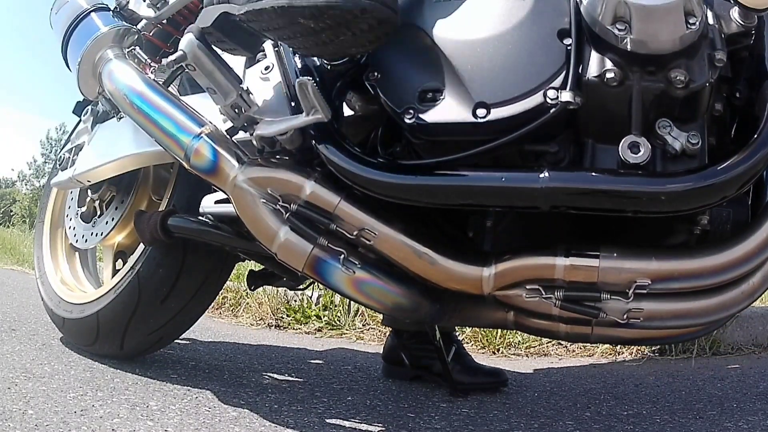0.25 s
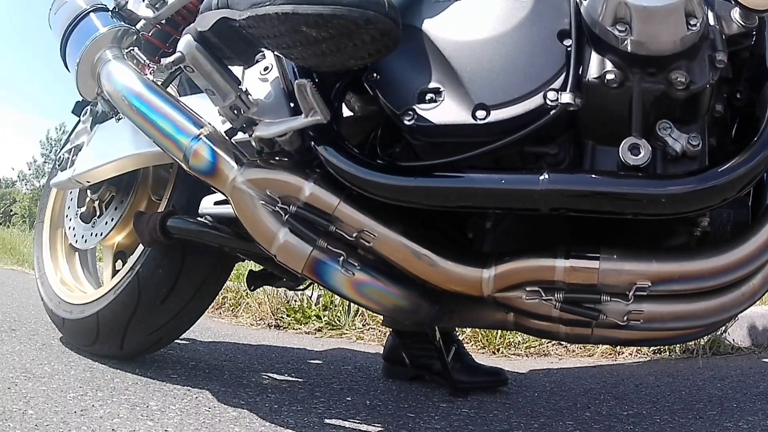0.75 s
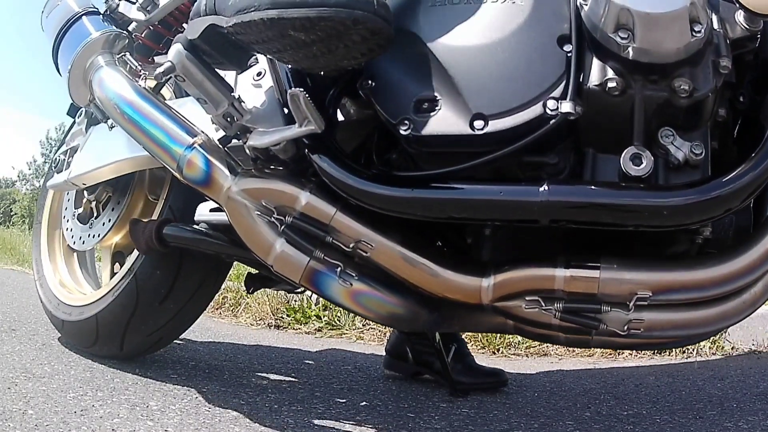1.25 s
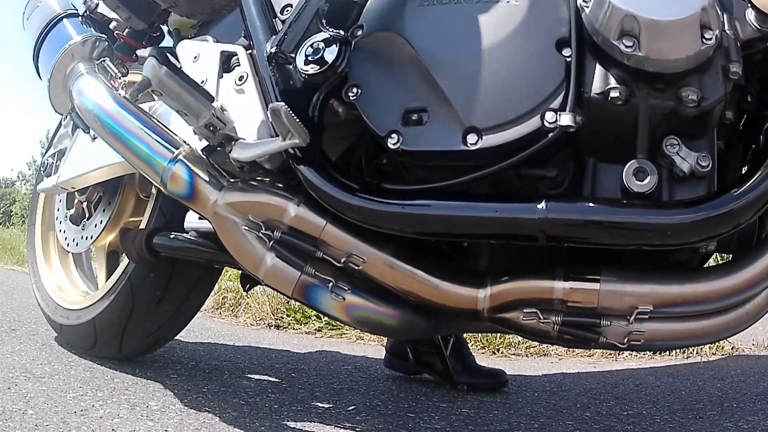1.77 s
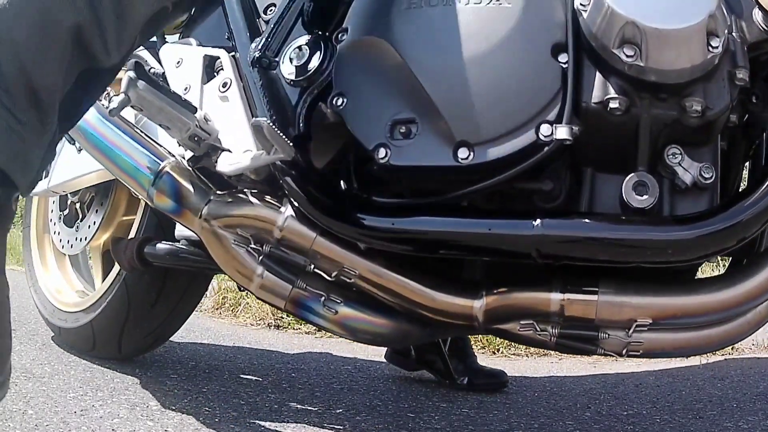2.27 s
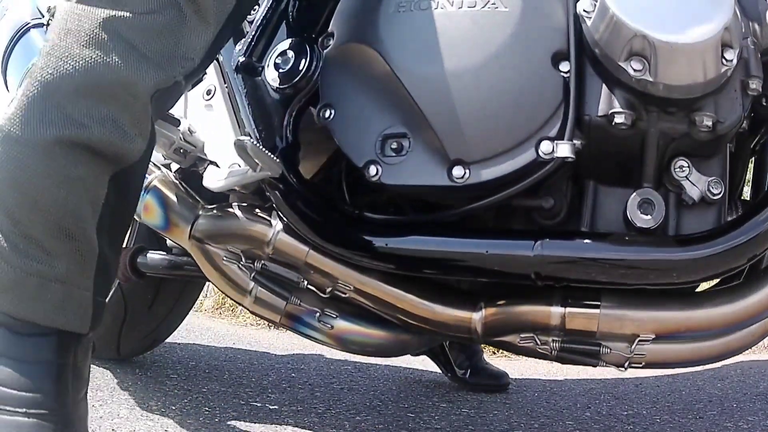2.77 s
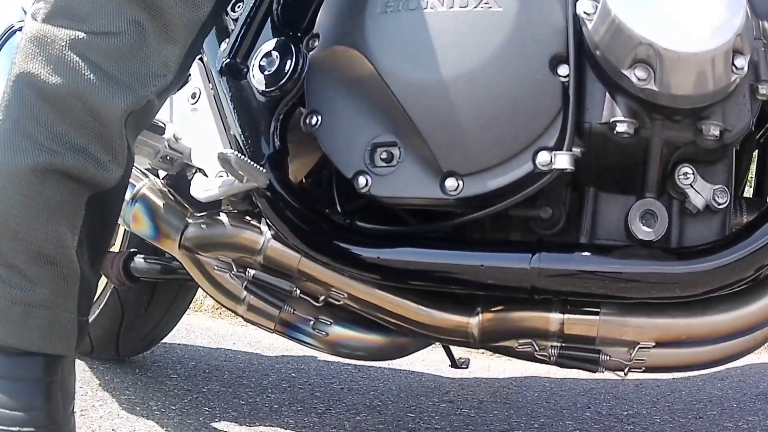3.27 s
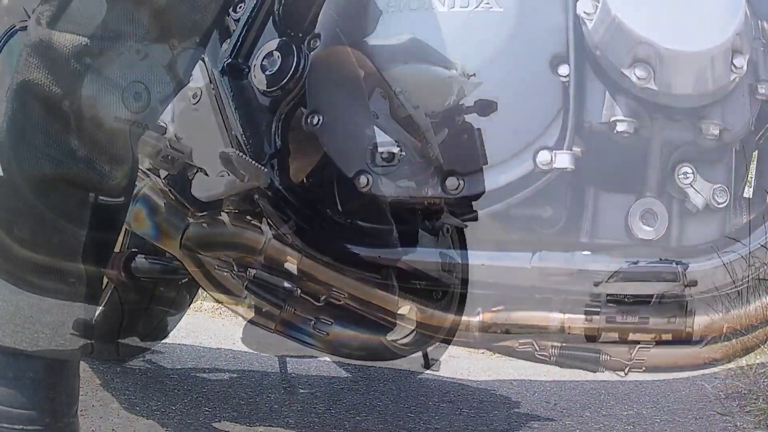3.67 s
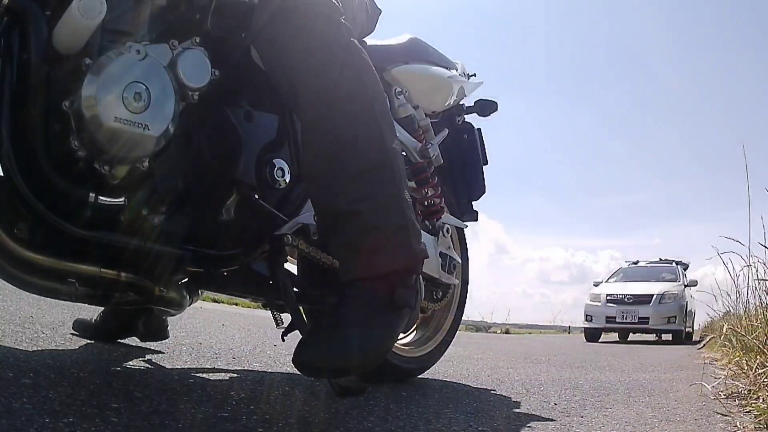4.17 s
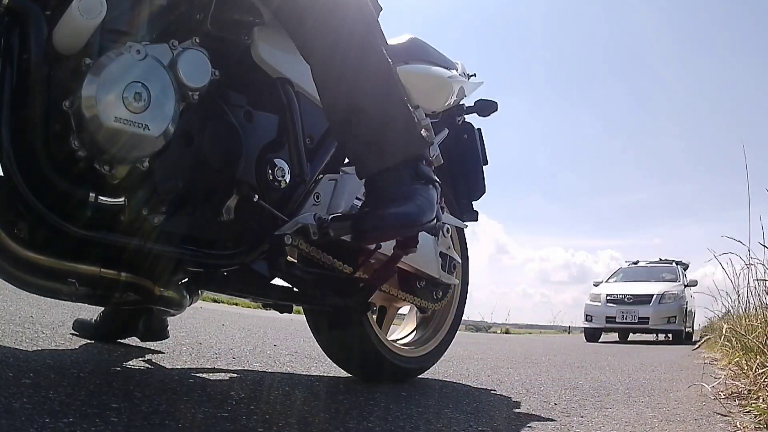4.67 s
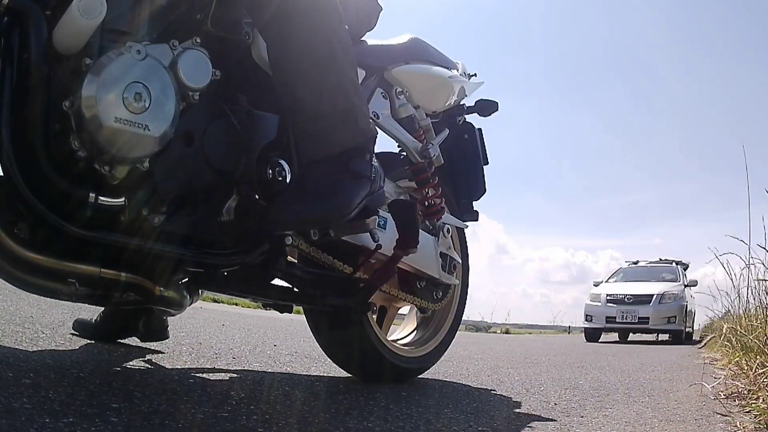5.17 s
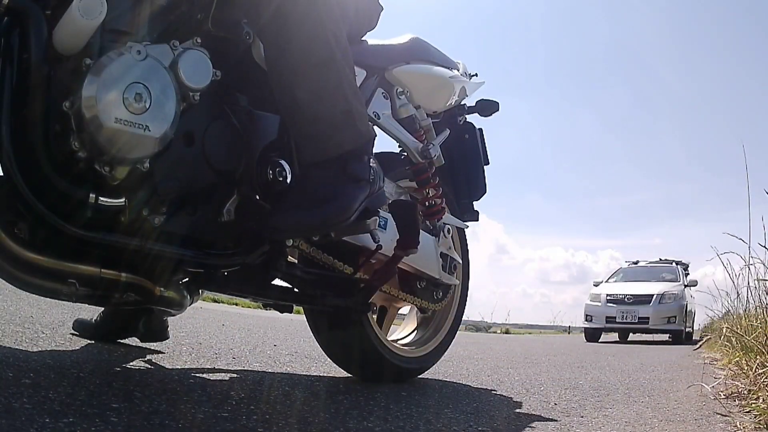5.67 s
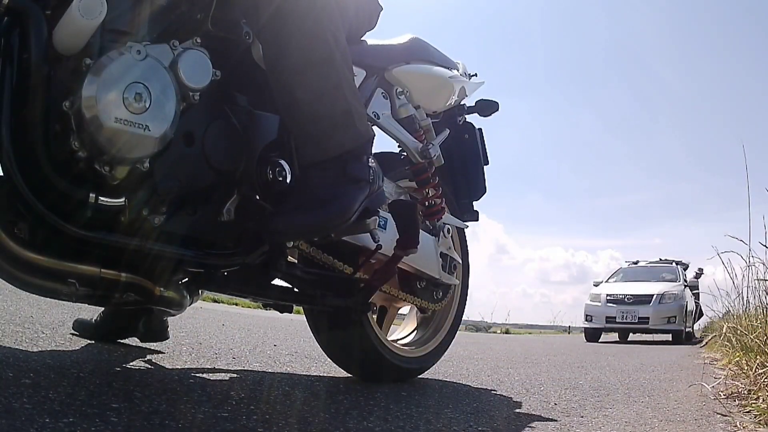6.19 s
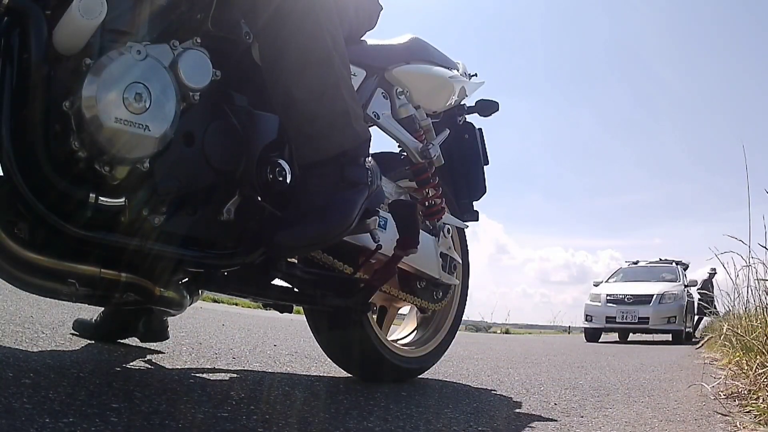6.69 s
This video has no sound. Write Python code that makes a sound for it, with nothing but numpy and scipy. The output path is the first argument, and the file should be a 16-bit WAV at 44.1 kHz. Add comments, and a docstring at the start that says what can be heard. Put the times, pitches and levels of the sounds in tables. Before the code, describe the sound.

A four-cylinder motorcycle is already idling, heard very close and dry outdoors. About 34 low, rounded exhaust thuds a second merge into a throaty burble, uneven because some firings are weak; it stumbles most between 0.6 and 1.6 s, with little sags in speed. Soft gas rush, dry valve and chain rattle and a faint wavering gear whine near 1500 Hz lie over it. From about 3.35 s the engine fades, nearly vanishing at 3.7 s, then swells back by 4.1 s from lower and further forward: somewhat quieter, with more ticking and tiny bright tappet pings about eight times a second. At 4.6 s the side stand slaps its stop, a loud, hard steel clack with very short ring, bouncing more softly at 4.7 and 4.76 s. The slightly irregular idle continues, unrevved, until it cuts off near 6.9 s.

```python
"""On a road, a four-cylinder motorcycle idles, heard beside the engine and then, after a fade out and in,
lower and further forward. Summed pressure waves make the uneven exhaust thud with its weak firings, and
gated noise its gas rush. Noise through the cases rattles, gear tones whine, and in the forward position
a tappet pings. Crashes with decaying steel modes make the side stand slap its stop and bounce twice."""
import sys
import numpy as np
from scipy import signal
from scipy.fft import rfft, irfft, next_fast_len
from scipy.io import wavfile
from scipy.ndimage import uniform_filter1d, map_coordinates

SR = 44100
rng = np.random.default_rng(int(sys.argv[2]) if len(sys.argv) > 2 else 0)


def wav_out(sig):
    """Save sig, one row per channel (or a flat mono array), as 16-bit PCM at SR to the path in sys.argv[1]."""
    wavfile.write(sys.argv[1], SR, np.round(np.clip(np.atleast_2d(sig).T, -1, 1) * 32767).astype(np.int16))


N = 305613


def amp(db):
    """Logarithmic level: decibels to gain."""
    return 10 ** (np.asarray(db) / 20)


def unit(x):
    """Power normalization: x scaled to rms 1."""
    return x / np.sqrt(np.mean(x ** 2) + 1e-20)


def curve(rows):
    """Linear interpolation in time: (start_s, value) rows to one value per sample."""
    return np.interp(np.arange(N) / SR, *np.transpose(rows))


def along(points, hz):
    """Interpolation on a logarithmic frequency axis: (pitch_hz, value) points read at hz."""
    f, v = np.transpose(points)
    return np.interp(np.log(hz + 1), np.log(f + 1), v)


def filtered(x, response):
    """Linear filtering: the spectrum of x times a response of frequency."""
    m = next_fast_len(N + SR // 2)
    return irfft(rfft(x, m) * response(np.fft.rfftfreq(m, 1 / SR)), m)[:N]


def wobble(rate):
    """Slow random modulation: a smooth curve with rate knots a second."""
    return map_coordinates(rng.standard_normal(int(N * rate / SR) + 4), [np.arange(N) * rate / SR])


def bump(x, centre, width):
    """Gaussian pulse of height 1."""
    return np.exp(-.5 * ((x - centre) / width) ** 2)


# firings weaker or stronger than the rest; 1 is a full burn, below 0 gas is sucked back as the valve opens:
# start_s, burn_strength
WEAK_FIRINGS = [(0.01, 0.9), (0.11, 0.75), (0.35, 0.75), (0.6, -0.44), (0.69, -0.38), (0.81, 1.25),
                (0.84, 0.2), (0.92, 0.0), (1.08, -0.6), (1.17, 0.5), (1.32, 0.3), (1.41, 0.4), (1.56, 0.15),
                (1.81, 0.65), (1.9, 1.2), (2.0, 0.6), (2.06, 0.33), (2.43, 0.75), (2.55, 0.75), (3.13, 1.2),
                (3.25, 1.2), (3.28, 0.5), (3.37, 0.73), (3.525, 0.04), (3.615, 0.12), (4.35, 1.25),
                (4.61, 0.5), (4.85, 0.5), (5.57, 0.46), (5.81, 0.25), (5.9, 0.7), (6.05, 0.75),
                (6.52, 0.28), (6.75, 0.25), (6.84, 0.05)]
# idle speed the throttle aims for, beside the engine and further forward: start_s, firings_per_s
IDLE_NEAR = [(0.0, 33.46), (0.37, 32.44), (0.79, 37.0), (1.02, 36.09), (1.3, 35.96), (1.53, 34.52),
             (1.68, 34.51), (1.86, 33.57), (2.46, 33.64), (2.65, 32.31), (2.84, 33.15), (3.3, 33.05),
             (3.73, 34.42)]
IDLE_FRONT = [(3.73, 33.97), (4.19, 33.65), (5.11, 34.08), (5.61, 33.5), (5.95, 35.22), (6.31, 33.93),
              (6.53, 35.7), (6.93, 34.02)]
SAG_PER_S, RECOVER_S = 2.0, 0.2  # firings a second lost to a burn of strength 0, time constant to win them back


def crank(idle, start):
    """Rotation as integrated speed: firings passed at each sample, slowed after each weak firing."""
    t = np.arange(N) / SR
    first, last = idle[0][0], idle[-1][0]
    sag = sum((1 - strength) * (t > s) * np.exp(-abs(t - s) / RECOVER_S)
              for s, strength in WEAK_FIRINGS if first <= s < last)
    passed = np.cumsum(curve(idle) - SAG_PER_S * sag) / SR
    return start + passed - passed[round(first * SR)]


# burnt gas leaving the muffler: suck before the front, front, header echo, inverted echo of the open end;
# a weak burn widens and shrinks them: delay_ms, width_ms, size of cylinders 1, 2, 3, 4 at full burn
BLOWDOWN = [(-1.15, 1.12, -0.24, -0.23, -0.3, -0.34), (1.21, 1.31, 0.5, 0.4, 0.52, 0.51),
            (4.83, 1.2, 0.23, 0.41, 0.27, 0.26), (8.59, 1.36, -0.27, -0.11, -0.2, -0.33)]
# gas pumped by the pistons with or without a burn: two echoes of the neighbour, push, suction:
# delay_ms, width_ms (before a narrowing by 0.96), relative size of cylinders 1, 2, 3, 4
PUMPING = [(-10.0, 2.19, 0.06, 0.08, 0.19, 0.12), (-5.12, 1.72, 0.3, 0.24, 0.07, 0.04),
           (-1.21, 2.4, 0.19, 0.24, 0.27, 0.32), (11.51, 2.89, -0.02, -0.22, -0.22, -0.09)]
# slow slosh of a firing below 0: delay_ms, width_ms, size at strength -1
BACKFLOW = [(-8, 3, .15), (5, 2.3, -.85), (10.5, 2.6, .5)]
# muffler response: pitch_hz, level_db
MUFFLER = [(20, 0), (80, 2.5), (130, 2.5), (160, 1.5), (200, 4.5), (260, 2), (320, 4.5), (370, 20),
           (430, -5.5), (700, -11)]
WEAK_DULL = 0.24  # widening of the blowdown per unit of burn below 0.8
RUSH_MS, RUSH_IDLE = 7.4, 1  # delay and width of the gas rush after a burn, share that always flows
RUSH_DB = -37.5  # mean level of the muffler turbulence


def cylinder_waves(table, cylinder, ms, widen):
    """Superposition: direct and echoed Gaussian pressure waves, one row per firing."""
    return sum(np.take(size, cylinder)[:, None] * bump(ms, delay, width * widen)
               for delay, width, *size in table)


def exhaust(passed, span, pump_db, pump_db_per_s, scatter, jitter_ms, slip_ms):
    """Pulse-train radiation: each firing sends pressure waves; only blowdown, backflow and rush follow the burn."""
    t = np.arange(N) / SR
    first, last = np.interp(span, t, passed)
    firing = np.arange(np.ceil(first), last + 1).astype(int)
    # the time axis runs on one second past the end
    when = np.interp(firing, [*passed, passed[-1] + IDLE_FRONT[-1][1]], [*t, t[-1] + 1])
    chance = rng.standard_normal((len(firing), 2))
    burn = 1 + scatter * chance[:, 0]
    for s, strength in WEAK_FIRINGS:
        if span[0] <= s <= span[1]:
            k = np.argmin(abs(when - s))
            slip_s = slip_ms * (1 - strength) / 1000
            burn[k] = strength
            when[max(k - 1, 0)] -= slip_s  # the crank is still fast just before it
            when[k] += slip_s
    when += jitter_ms * chance[:, 1] / 1000

    near = np.arange(-SR // 40, SR // 40)
    ms = 1000 * near / SR
    at = np.round(when * SR).astype(int)[:, None] + near

    def placed(rows):
        return np.bincount(at.ravel() + SR, rows.ravel(), N + 2 * SR)[SR:SR + N]

    burnt, sucked = burn.clip(0)[:, None], (-burn).clip(0)[:, None]
    widen = 1 + WEAK_DULL * (.8 - burn).clip(0)[:, None]
    pump = amp(pump_db + pump_db_per_s * (when - np.mean(span)))[:, None]  # the low thud drifts slowly
    shape = burnt * cylinder_waves(BLOWDOWN, firing % 4, ms, widen)
    shape += pump * cylinder_waves(PUMPING, firing % 4, ms, 0.96)
    shape += sucked * sum(size * bump(ms, delay, width) for delay, width, size in BACKFLOW)
    thud = filtered(placed(shape), lambda f: amp(along(MUFFLER, f)))
    gate = RUSH_IDLE + placed(burnt * bump(ms, RUSH_MS, RUSH_MS))
    return thud + turbulence(RUSH_DB, gate)


# contacts as the side stand hits its stop and chatters through two bounces; peak before the closing taper:
# start_s, peak_db, rise_ms, tilt_db_per_octave
STAND_CONTACTS = [(4.594, -15.5, 3, 9), (4.598, -5, 2.1, 1), (4.601, -2, 4.1, 0.5),
                  (4.6075, -2.5, 1.6, -4.5), (4.615, -14, 4.7, -3), (4.628, -23, 4, -2),
                  (4.638, -21.5, 6.2, -6), (4.696, -11.5, 2.7, -2), (4.700, -8, 3.4, -1.5),
                  (4.708, -13, 2.5, -6.5), (4.714, -12, 3.8, -6), (4.754, -17, 2.3, -2.5),
                  (4.761, -19, 3.8, -3), (4.769, -19, 4.6, -10), (4.783, -27, 4, -11),
                  (4.793, -28, 3.4, -13)]
# modes of stand and bracket, levels relative and scattered at each contact: pitch_hz, level_db, t60_s
STEEL_MODES = [(616, -10, 0.06), (780, -11.5, 0.035), (913, 2.5, 0.052), (990, 1, 0.028), (1064, 3, 0.037),
               (1210, -8, 0.055), (1370, -9, 0.063), (1850, -4.5, 0.055), (1954, -3, 0.031),
               (2350, 3.5, 0.036), (2680, 8, 0.034), (2900, -8, .03), (3570, -3, .023), (3790, -7, .027),
               (5290, -13, 0.057), (6010, -26, .09), (5940, -19, 0.07), (11535, -22, 0.17)]
# bare steel-on-steel contact, relative spectrum: pitch_hz, level_db (per Hz)
CRASH = [(240, -36), (450, -14), (750, -12.5), (1000, 5), (1500, -11.5), (2000, -8.5), (2700, -9.5),
         (3300, -11.5), (6000, -18), (9500, -35.5), (11600, -28), (15600, -51)]


def stand():
    """Impact excitation: each contact is a noise crash of steel on steel that also rings the stand's modes."""
    out, t = np.zeros(N + SR), np.arange(SR // 8) / SR
    hz_grid = np.fft.rfftfreq(len(t), 1 / SR)
    for s, peak_db, rise_ms, tilt_db in STAND_CONTACTS:
        rises = 1000 * t / rise_ms
        chatter = rng.standard_normal(len(t)) * rises * np.exp(-rises)
        colour_db = along(CRASH, hz_grid) + tilt_db * np.log2(hz_grid / 1000 + 0.093)
        crash = irfft(rfft(chatter) * amp(colour_db), len(t))
        modes = sum(amp(level + tilt_db * np.log2(hz / 1000) + rng.normal(0, 2.2) - 60 * t / t60)
                    * np.sin(2 * np.pi * hz * t) for hz, level, t60 in STEEL_MODES)
        blow = 0.95 * unit(crash) + unit(modes * (1 - np.exp(-rises)))
        taper = 1 - t / t[-1]  # each contact fades to silence
        out[round(s * SR):][:len(t)] += amp(peak_db) * blow / abs(blow).max() * taper
    return out[:N]


# engine cases, relative spectrum, beside the engine and further forward: pitch_hz, level_db (per Hz)
CASE_NEAR = [(250, -5.5), (430, -3), (547, 0.5), (685, -7.5), (1500, -3.5), (1790, -7), (2610, -7.5),
             (3310, -15.5), (4900, -19.5), (7340, -50), (9770, -54), (11400, -34.5), (13000, -48),
             (15600, -42)]
CASE_FRONT = [(260, -18), (430, -5.5), (700, -8), (950, -7), (1250, -6), (1420, -13), (1610, -8),
              (1900, -13.5), (2400, -11.5), (3400, -21), (3950, -22), (4100, -27), (4550, -34),
              (4750, -21.5), (6500, -35.5), (9800, -62.5), (15600, -41.5)]
# ringing covers and gears, levels relative: pitch_hz, width_hz, level_db, knock_rise_db,
# knock_at (firings into each cam turn), drift_db_per_s (from the start of each listening position)
RING_NEAR = [(517, 280, -46, -3, 1.8, -7), (1388, 65, -29.5, 7, 0.098, 2.5), (1264, 100, -30.5, 7, 1.8, 1),
             (2217, 32, -30.5, -2, 2.8, 2.5), (2630, 30, -21.5, 3, 1.1, -3.5), (6260, 5100, -33, 4, 1.9, 1),
             (12400, 2000, -38.5, 13, 1.95, -1.5)]
RING_FRONT = [(599, 25, -19, 2, 1, 0), (787, 54, -12, 3.1, 2.5, 0), (1218, 35, -22, 7.9, 2.35, 0),
              (2140, 70, -20.5, 9.8, 0.25, 0), (2398, 39, -19, 2.9, 0.68, 0),
              (5370, 71, -34.5, 16, 2.54, 0), (7600, 3600, -29.5, 8.5, 2.27, 0),
              (11900, 1100, -33.5, 4.7, 1.8, 0)]
TAP_AT = 1.95  # firings into each cam turn at which one loose valve taps
CLACK_AT, CLACK_DIES = 0.8, 0.35  # each valve seats late in a firing and fades (both in firings)
CLACK_TOP_HZ = 2500  # seating valves ring only the covers below this
FLICKER_DB = 2.5  # how far each cover's ring comes and goes


def rattle(passed, case, ring, level_db, ticks, tick_db, beat_db, clack_db, since):
    """Resonance under noise excitation: valve gear, chain and gears drive the cases, swelling at each firing."""
    grit = (rng.random(N) < ticks / SR) * rng.standard_normal(N)  # on average, ticks a second
    drive = rng.standard_normal(N) + amp(tick_db) * unit(grit)
    swell_db = beat_db * np.cos(2 * np.pi * (passed - .03)) + .5 * wobble(14) + .9 * wobble(60)

    def knock(at):  # once a cam turn of four firings
        return bump((passed - at + 2) % 4 - 2, 0, .2) * (1 + .12 * wobble(8))

    since_seating = passed - CLACK_AT
    strength = abs(1 + .22 * rng.standard_normal(200))[since_seating.clip(0).astype(int) % 200]
    clack = clack_db * strength * np.exp(-(since_seating % 1) / CLACK_DIES)
    out = amp(2.0 * knock(TAP_AT)) * unit(filtered(drive, lambda f: amp(along(case, f))))
    for hz, width, db, knock_db, at, drift_db in ring:  # each cover is set ringing in its own fits and starts
        cover = unit(filtered(drive, lambda f: 1 / (1 + (2 * (f - hz) / width) ** 2)))
        cover_db = db + knock_db * knock(at) + FLICKER_DB * wobble(20) + drift_db * since
        if hz < CLACK_TOP_HZ:
            cover_db = cover_db + clack - clack.mean()
        out += amp(cover_db) * cover
    return amp(level_db + swell_db) * out


# centre pitch of the gear mesh, beside the engine and further forward: start_s, pitch_hz
MESH_NEAR = [(0, 1510), (.1, 1485), (.2, 1500), (.49, 1480), (.54, 1600), (.62, 1495), (.7, 1470),
             (.74, 1570), (.8, 1610), (.88, 1570), (.93, 1490), (1.04, 1540), (1.17, 1450), (1.24, 1570),
             (1.35, 1560), (1.44, 1470), (1.52, 1540), (1.6, 1470), (1.84, 1540), (1.91, 1515),
             (1.96, 1605), (2.03, 1500), (2.17, 1470), (2.27, 1550), (2.4, 1520), (2.58, 1460),
             (2.71, 1480), (2.76, 1550), (2.9, 1500), (2.95, 1545), (3.02, 1520), (3.08, 1550),
             (3.22, 1535), (3.38, 1480), (3.43, 1570), (3.55, 1470), (3.65, 1410)]
MESH_FRONT = [(3.9, 1570), (4.1, 1580), (4.2, 1555), (4.55, 1570), (4.78, 1580), (4.97, 1535), (5.06, 1587),
              (5.45, 1565), (5.6, 1530), (5.77, 1610), (5.86, 1530), (6.03, 1585), (6.2, 1555), (6.5, 1620),
              (6.7, 1585), (6.93, 1545)]
# slow course of the whine, relative: start_s, level_db
MESH_LEVEL = [(0, -2.5), (.5, 1), (.9, -3.5), (2.2, -1.5), (2.4, -0.5), (3.0, -1.5), (3.35, 2), (3.9, -1),
              (4.2, -1), (4.5, 0), (4.95, -2.5), (5.13, 0.5), (5.25, -4), (5.4, 1), (5.6, -10), (5.77, 1.5),
              (5.87, -9), (6.05, 2), (6.2, -6), (6.4, 1), (6.7, -0.5), (6.93, -8)]
SURGE_AT = .3  # firings into each cam turn at which the gears jump ahead, to slow until the next


def whine(passed, pitch, level_db, waver, ripple, surge, slack_at, slack_db):
    """Frequency modulation: a gear mesh tone follows the crank's surges, wavers and ripples with each stroke."""
    hz = uniform_filter1d(curve(pitch), SR // 30)
    stroke = np.cos(2 * np.pi * (passed - .1))
    jump = .5 - (passed - SURGE_AT) % 4 / 4
    hz *= 1 + waver * wobble(16) - ripple * stroke + surge * jump
    slack = bump((passed - slack_at + 1) % 2 - 1, 0, .25)  # the mesh unloads once a crank turn
    load_db = 2.2 * wobble(25) - slack_db * slack
    return amp(level_db + curve(MESH_LEVEL) + load_db) * np.sin(2 * np.pi * np.cumsum(hz) / SR)


PING_HZ, PING_T60_S, PING_AT = 5360, .04, 1.65  # a tappet pings this many firings into each cam turn


def ping(passed, level_db, scatter_db):
    """Damped free vibration: a tappet rings short and bright once a cam turn."""
    struck = np.diff((passed - PING_AT) // 4, prepend=0) > 0
    blows = struck * amp(level_db + scatter_db * wobble(40))
    t = np.arange(SR // 10) / SR
    envelope = amp(-60 * t / PING_T60_S) * (1 - np.exp(-t / 0.0029))
    return signal.fftconvolve(blows, envelope * np.sin(2 * np.pi * PING_HZ * t))[:N]


# muffler turbulence, relative spectrum: pitch_hz, level_db (per Hz)
FLOW = [(15, -26), (40, -32), (150, -9), (300, 2), (380, -7.5), (480, -23), (900, -54)]


def turbulence(level_db, gate):
    """Flow noise: gas rushes through the muffler as coloured noise, most of all after a burn."""
    flow = filtered(rng.standard_normal(N), lambda f: amp(along(FLOW, f)))
    return amp(level_db + 1.46 * wobble(12)) * unit(gate * flow)


# exhaust colour further forward: pitch_hz, level_db
FRONT_SPOT = [(105, 0.1), (134, 4), (170, -4), (205, -2), (250, -2), (340, 0.5), (450, -4)]
MOVE_S = 3.73  # the listening position changes here
FADE_OUT_S, FADE_IN_S = 0.38, 0.38  # before and after the change
NEAR_DB, FRONT_DB = -2.5, -5  # gain of the engine in each position


def scene():
    """Superposition of sources: the engine from two positions, faded out and in between, plus the stand."""
    t = np.arange(N) / SR
    turns = crank(IDLE_NEAR, start=0.48)
    near = exhaust(turns, (0, MOVE_S), pump_db=2.5, pump_db_per_s=0.16,
                   scatter=0.1, jitter_ms=0.28, slip_ms=1.09)
    near += rattle(turns, CASE_NEAR, RING_NEAR, level_db=-35.0, ticks=360, tick_db=-10.5,
                   beat_db=1.0, clack_db=18.5, since=t)
    near += whine(turns, MESH_NEAR, level_db=-36.5, waver=0.006, ripple=0.015, surge=.025,
                  slack_at=1.58, slack_db=7)

    turns = crank(IDLE_FRONT, start=2.1)
    front = exhaust(turns, (MOVE_S, N / SR), pump_db=2.0, pump_db_per_s=-0.36,
                    scatter=0.09, jitter_ms=0.29, slip_ms=0.86)
    front = filtered(front, lambda f: amp(along(FRONT_SPOT, f)))
    front += rattle(turns, CASE_FRONT, RING_FRONT, level_db=-36.5, ticks=510, tick_db=-10.5,
                    beat_db=0.45, clack_db=10.0, since=t - MOVE_S)
    front += whine(turns, MESH_FRONT, level_db=-37.5, waver=.008, ripple=0.0059, surge=0.0092,
                   slack_at=1.65, slack_db=17)
    front += ping(turns, level_db=-38.5, scatter_db=4.5)

    fade_out = np.clip((MOVE_S - t) / FADE_OUT_S, 0, 1)
    fade_in = np.clip((t - MOVE_S) / FADE_IN_S, 0, 1)
    engine = amp(NEAR_DB) * fade_out * near + amp(FRONT_DB) * fade_in * front
    return (engine + stand())[None]


DIP_FROM_DB, DIP_SHARE = -18.5, 0.12  # threshold, share of the excess taken off
DIP_BACK_DB_PER_S, SHARP_HZ = 1.5, 800  # recovery, band above which the sharp sounds are weighed
LOW_HZ, TOP_HZ = 14, 15719  # band limits


def record(dry):
    """Level shaping and band limiting: the whole sound dips slightly after sharp clacks, then recovers."""
    t = np.arange(N) / SR
    sharp = filtered(dry[0], lambda hz: hz > SHARP_HZ)
    power = abs(uniform_filter1d(sharp ** 2, size=SR // 100, origin=SR // 200 - 1))
    need_db = DIP_SHARE * (10 * np.log10(power + 1e-12) - DIP_FROM_DB).clip(0)
    recovery_db = DIP_BACK_DB_PER_S * t
    dip_db = np.maximum.accumulate(need_db + recovery_db) - recovery_db

    def band(hz):
        return (hz < TOP_HZ) / np.hypot(1, (LOW_HZ / (hz + .1)) ** 4)

    return filtered(amp(-dip_db) * dry[0], band)[None]


dry = scene()
out = record(dry)
wav_out(out)
```